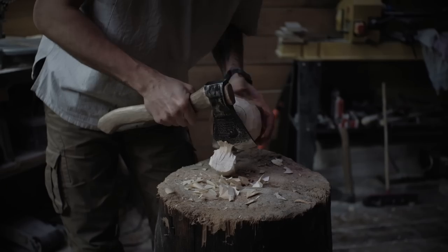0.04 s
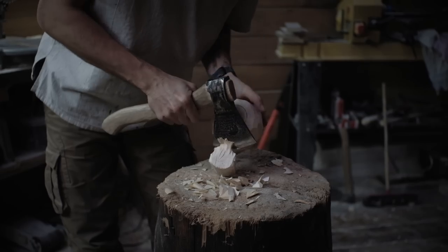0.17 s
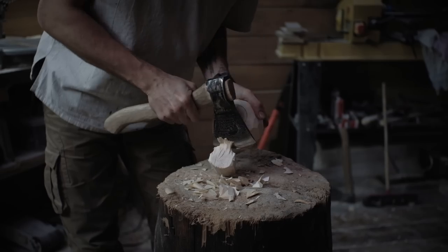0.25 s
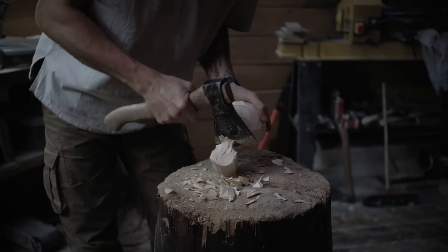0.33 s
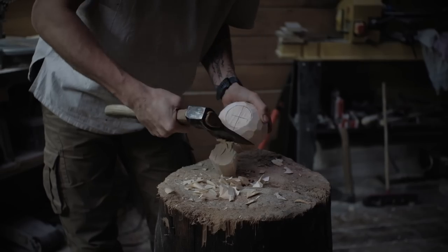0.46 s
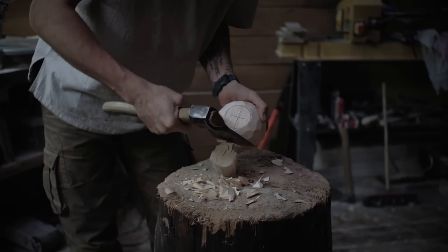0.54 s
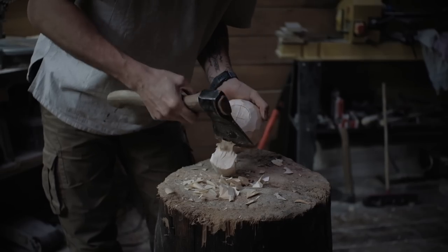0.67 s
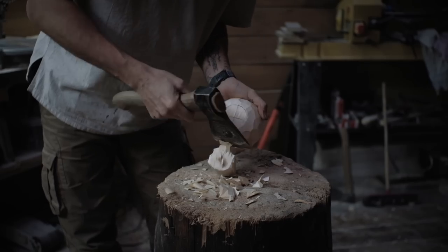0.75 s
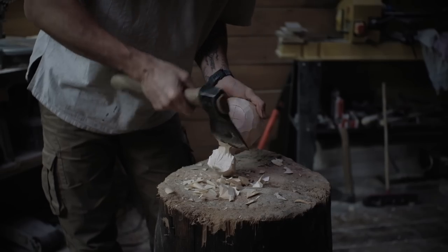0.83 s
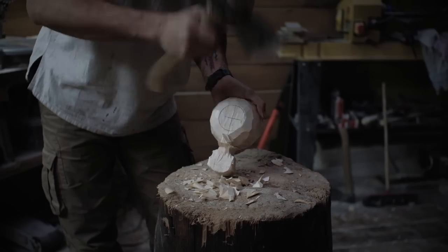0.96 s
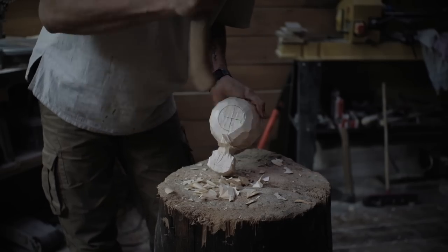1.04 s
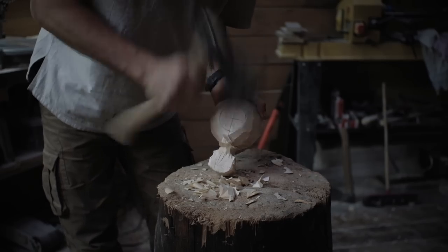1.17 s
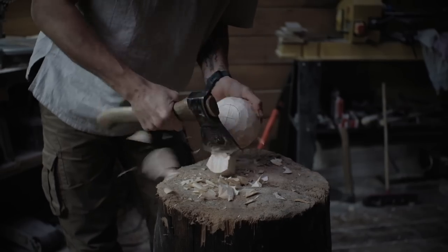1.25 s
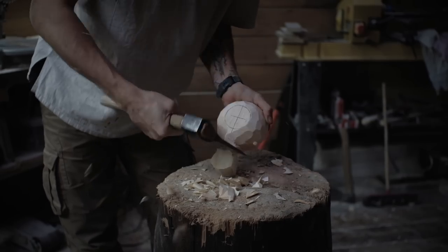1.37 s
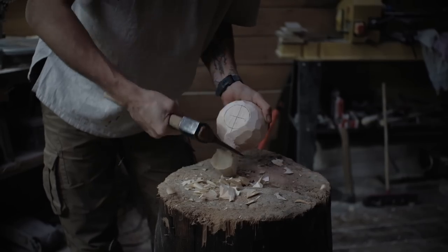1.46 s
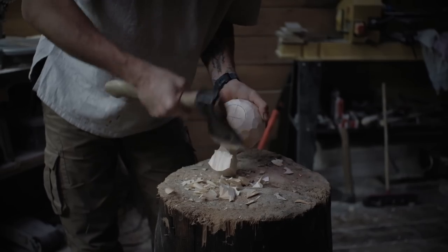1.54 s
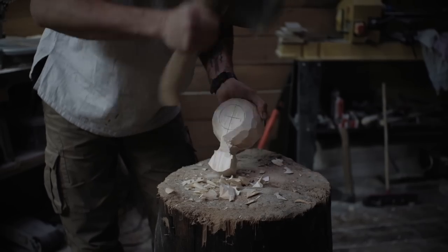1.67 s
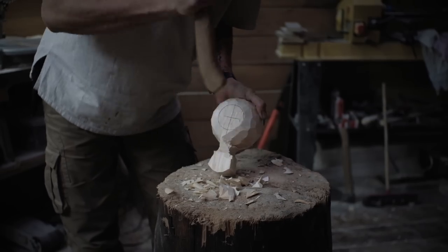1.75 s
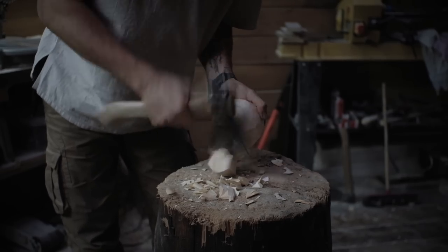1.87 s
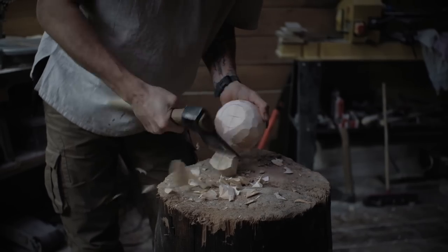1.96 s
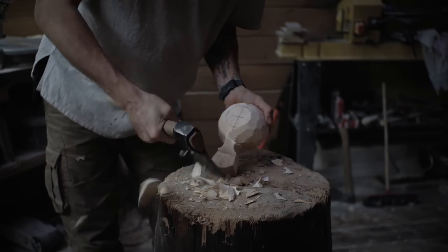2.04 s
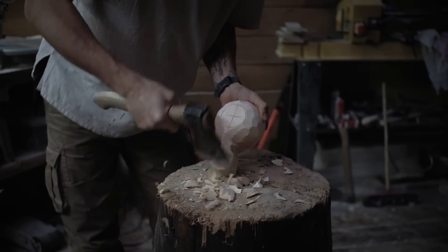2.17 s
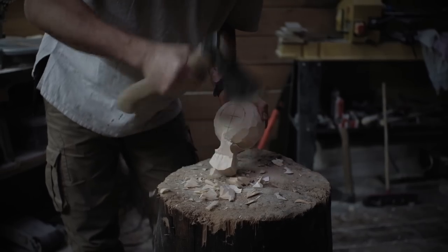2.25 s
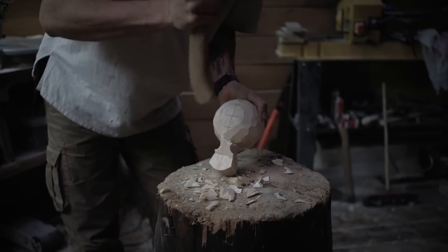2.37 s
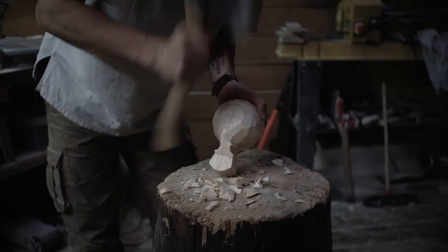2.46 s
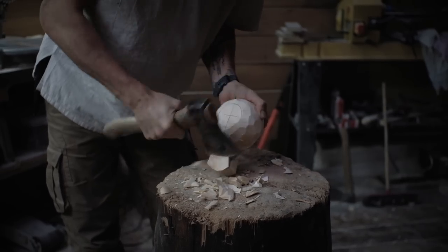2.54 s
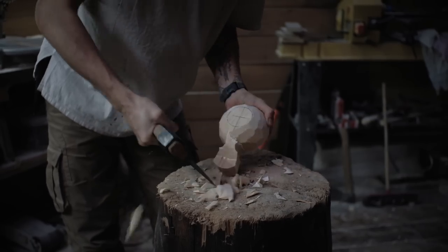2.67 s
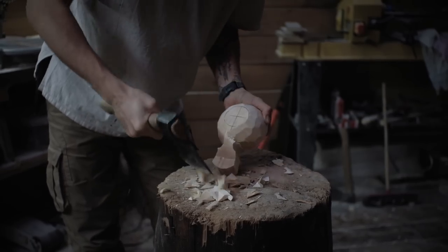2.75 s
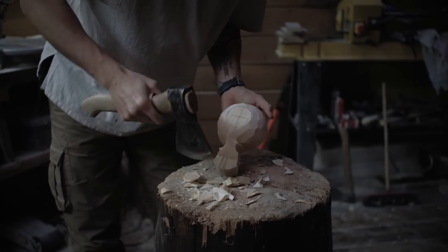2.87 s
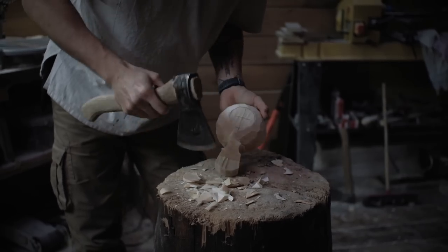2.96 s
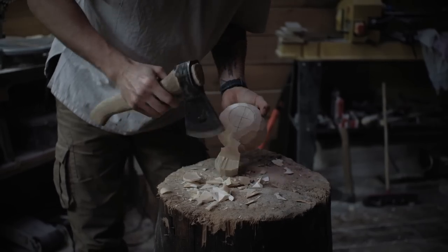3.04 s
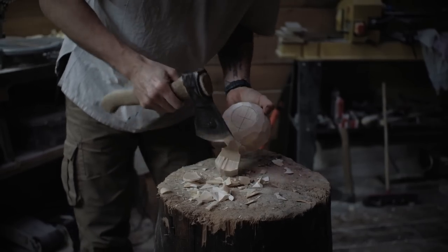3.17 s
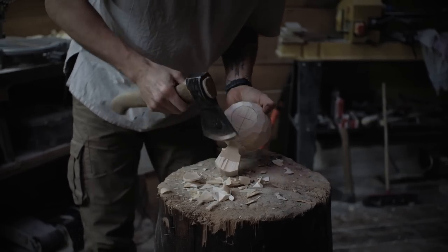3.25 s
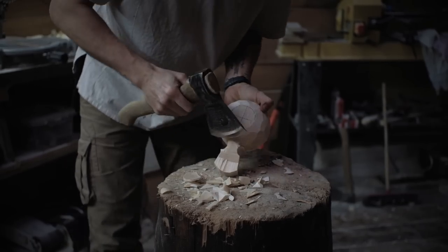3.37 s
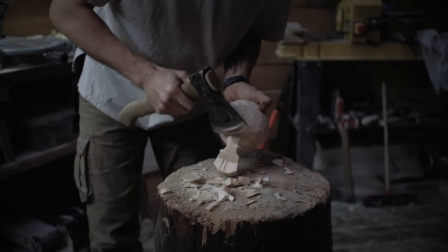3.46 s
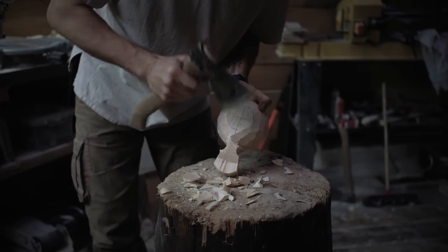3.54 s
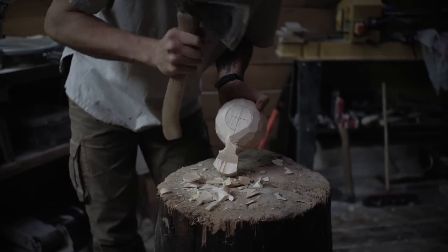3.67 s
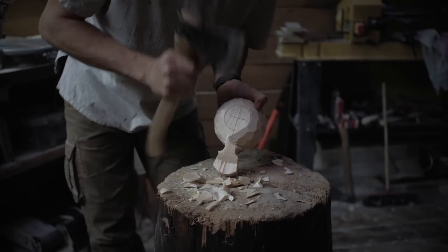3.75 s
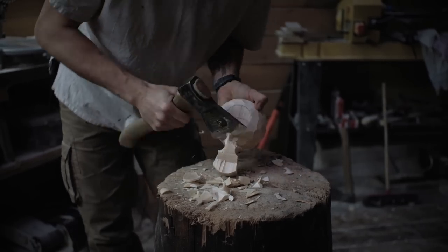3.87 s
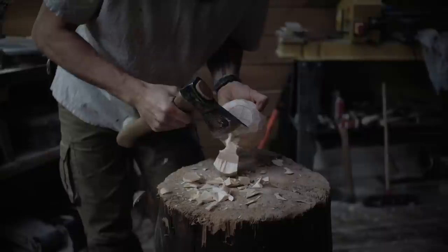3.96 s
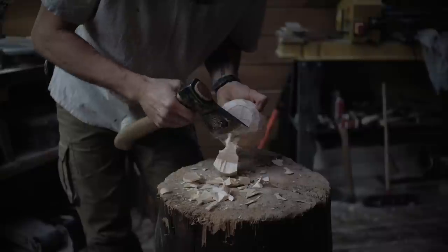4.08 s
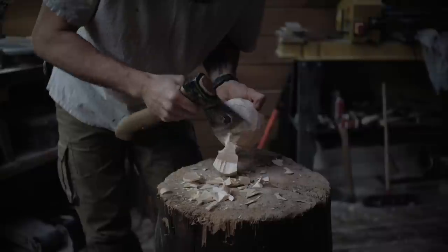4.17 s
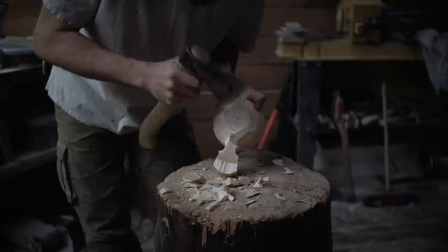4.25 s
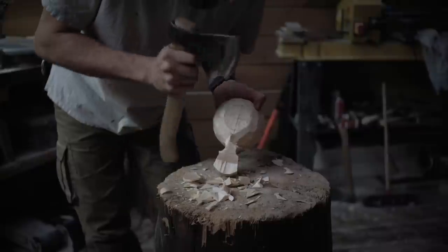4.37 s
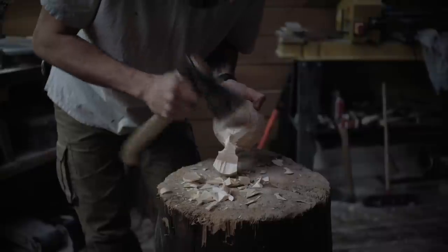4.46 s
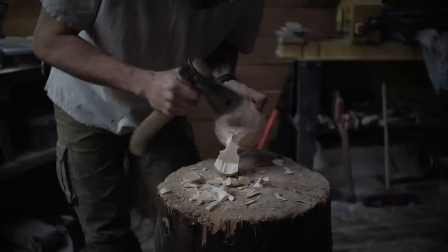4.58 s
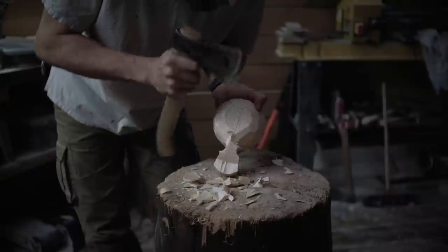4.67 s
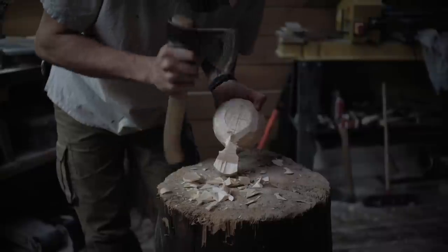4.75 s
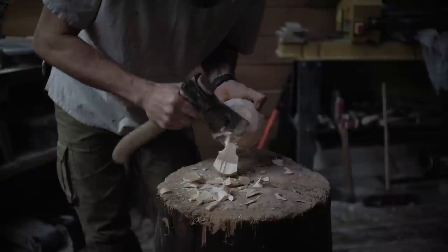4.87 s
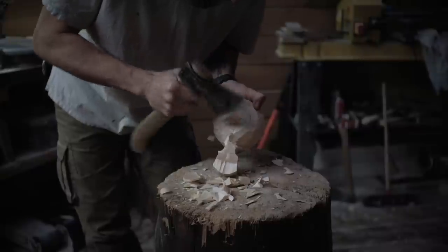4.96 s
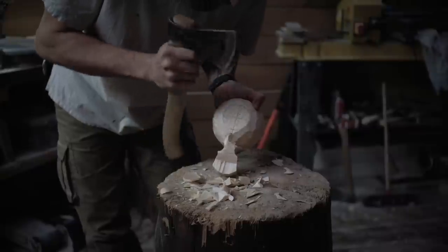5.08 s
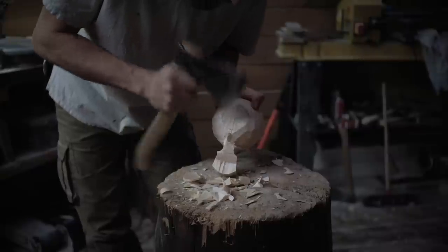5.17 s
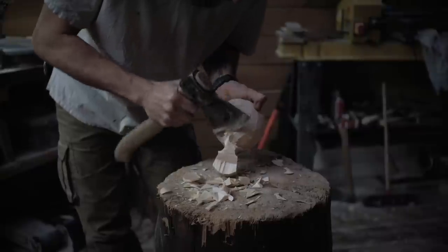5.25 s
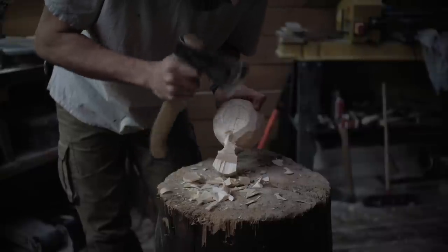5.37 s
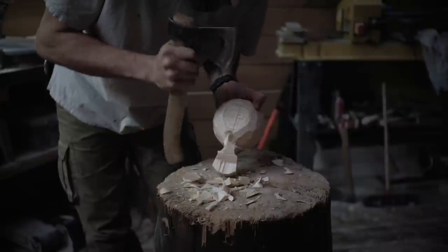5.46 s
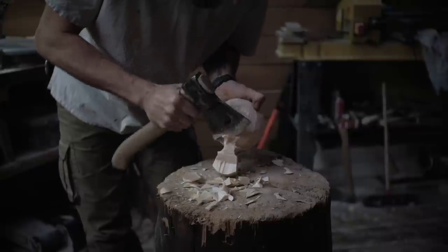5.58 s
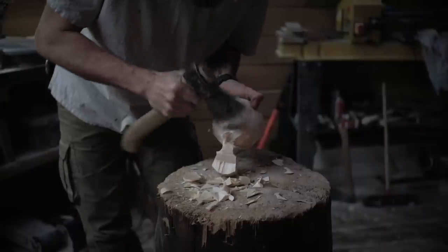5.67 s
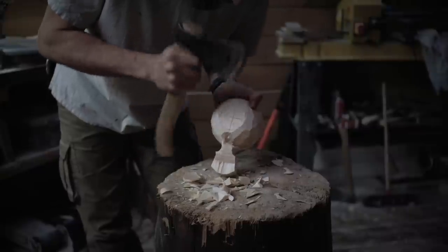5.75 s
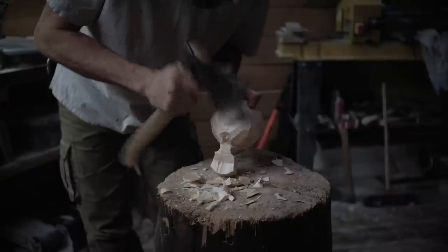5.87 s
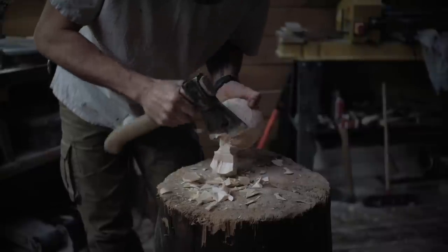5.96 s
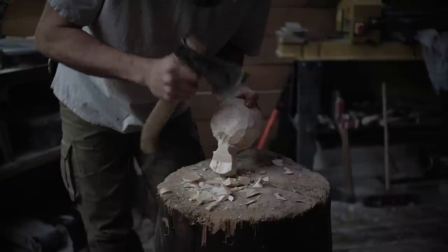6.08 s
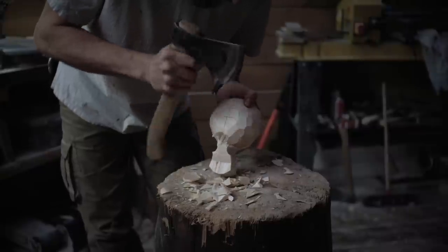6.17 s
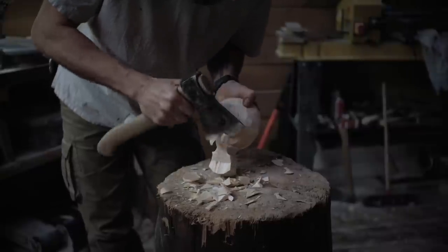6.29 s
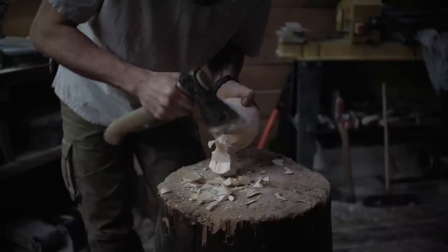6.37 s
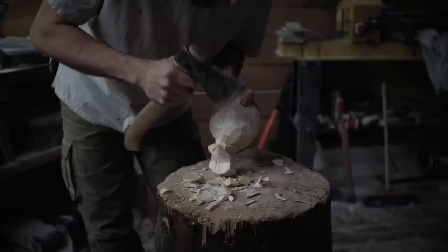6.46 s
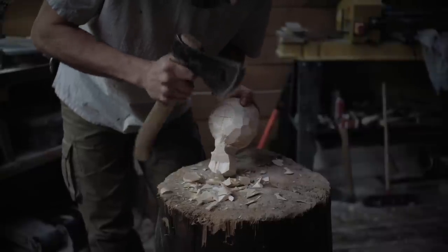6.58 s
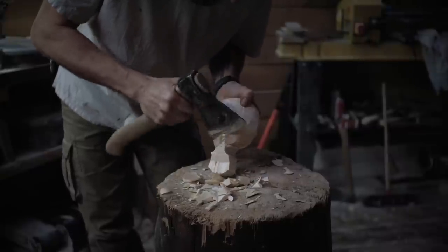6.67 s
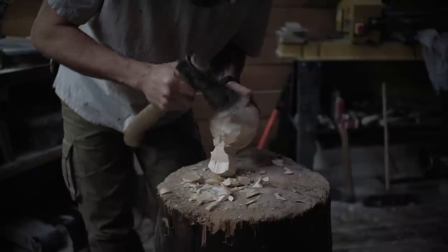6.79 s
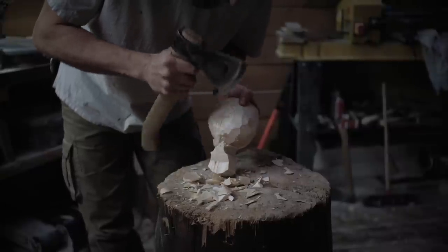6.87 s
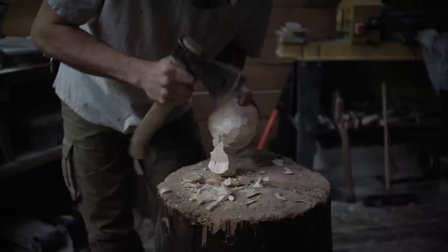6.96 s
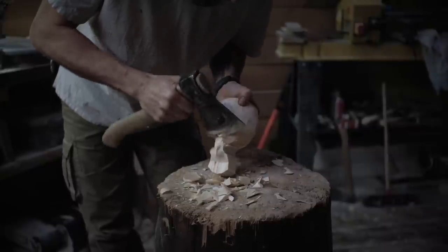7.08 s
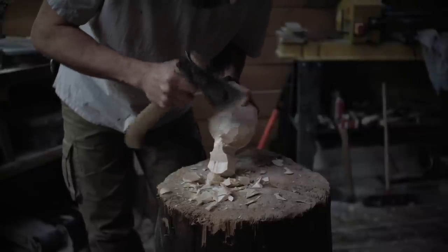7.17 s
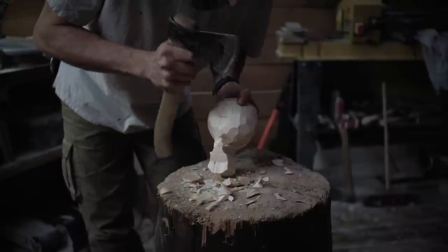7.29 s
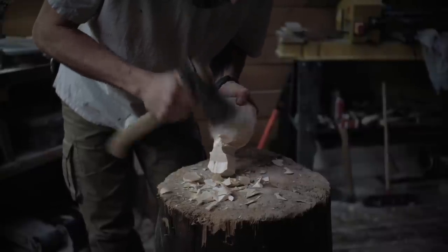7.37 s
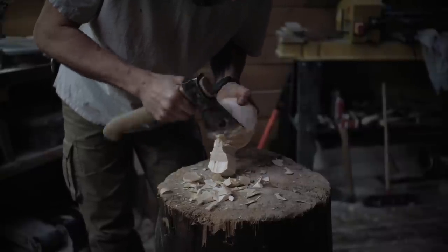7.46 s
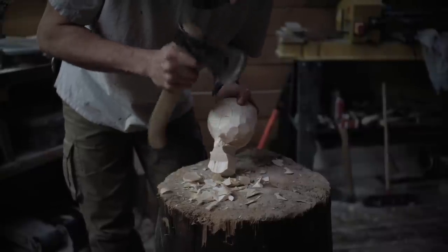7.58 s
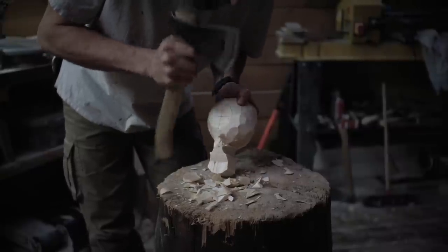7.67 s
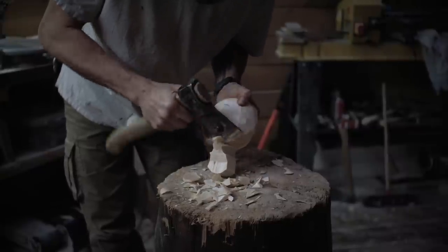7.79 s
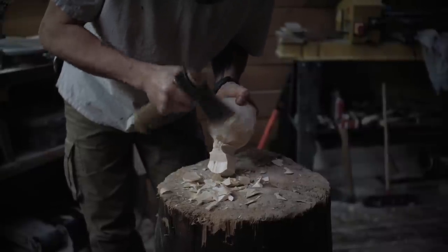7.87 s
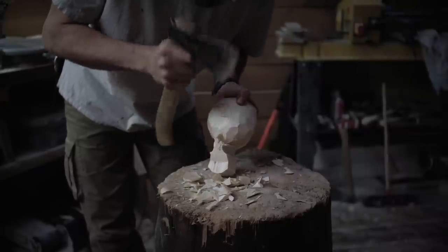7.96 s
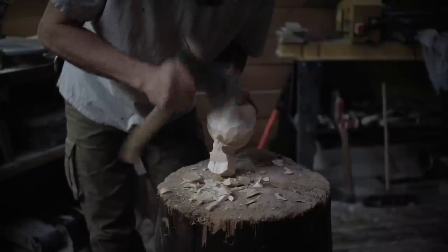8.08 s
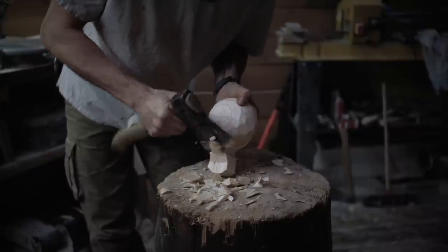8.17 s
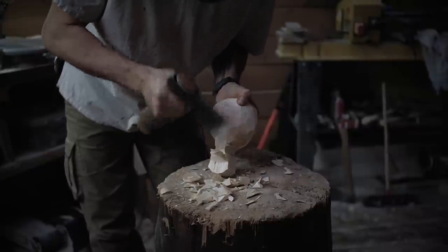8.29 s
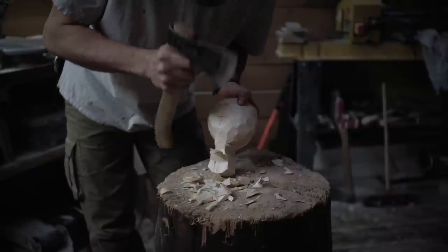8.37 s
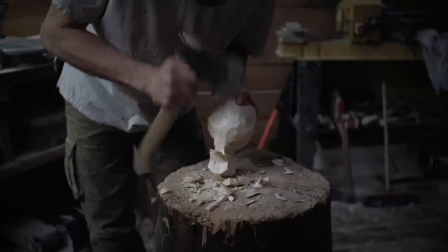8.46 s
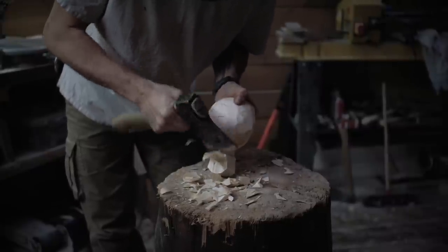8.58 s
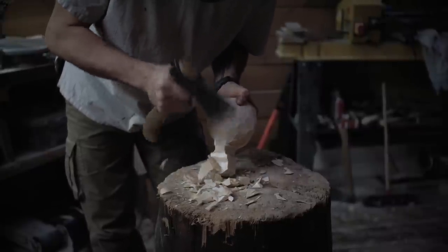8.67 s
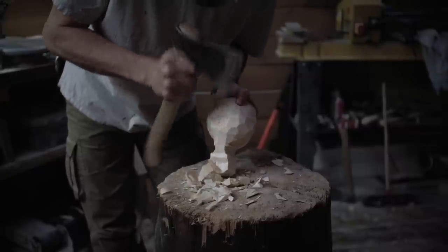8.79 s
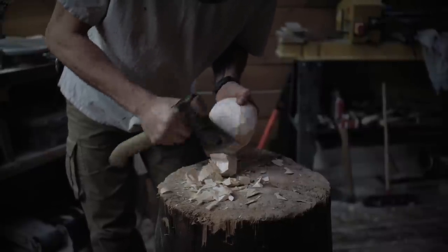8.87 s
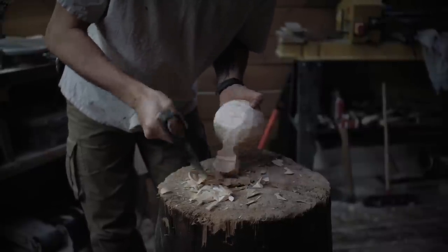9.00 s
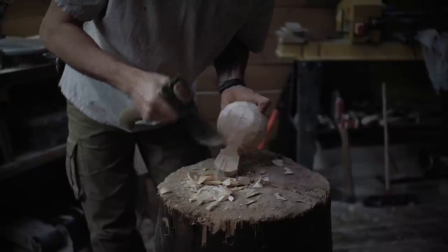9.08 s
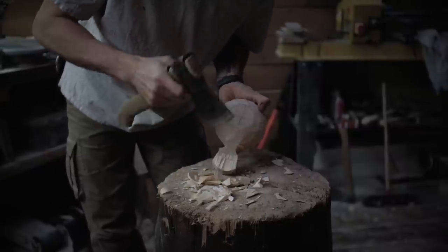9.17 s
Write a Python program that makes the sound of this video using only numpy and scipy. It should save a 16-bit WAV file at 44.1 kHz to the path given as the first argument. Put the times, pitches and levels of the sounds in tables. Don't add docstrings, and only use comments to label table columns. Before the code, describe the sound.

Close stereo sound of an axe hewing wet wood on a chopping block. A hushed opening with tiny ticks of chips, then several hard, uneven strokes: hollow knock, fibrous crack, brief dull steel ring. A scraping pause leads into regular lighter chops, nearly three each second, strengthening at the end. Small timber workshop, short tail, soft low floor thump beneath.

```python
import sys
import numpy as np
from scipy import signal
from scipy.fft import rfft, irfft
from scipy.io import wavfile
from scipy.ndimage import uniform_filter1d

SR = 44100
rng = np.random.default_rng(int(sys.argv[2]) if len(sys.argv) > 2 else 0)


def digitize_waveform(pressure):
    field = np.atleast_2d(pressure).T
    bounded = np.clip(field, -1, 1)
    quanta = np.round(bounded * 32767).astype(np.int16)
    wavfile.write(sys.argv[1], SR, quanta)


def gain_from_db(level_db):
    decades = np.asarray(level_db, float) / 20
    return 10 ** decades


N = 407043

# (frequency [Hz], level [dB])
HUSH_SPECTRUM = [(20, -1), (33, -8.5), (172, -8.5), (245, -10.5), (295, -11.5), (430, -11.5), (3970, -35.5),
                 (14500, -51.5)]
# (frequency [Hz], side re mid [dB])
HUSH_WIDTH = [(60, -3.5), (300, -4), (1500, -2), (15000, 1.8)]
# (frequency [Hz], level [dB], t60 [s])
FLOOR_MODES = [(31.5, -1, 0.4), (49.7, -8, 0.33), (78.5, -3, 0.36), (100.8, -5.5, 0.38)]
# (time [s], knock [dB], crack re knock [dB], edge tick re knock [dB], length [ms])
SCRAPES = [(0.003, -33.5, 2.5, -40.5, 5.8), (0.17, -27.5, -3, -2, 41), (0.41, -32.5, 6, -6, 24),
           (0.58, -45, 15, -30, 110), (0.7, -58, 22, -30, 62), (0.8, -56, 10, -25, 58),
           (1.35, -8.5, 11.5, -22, 12), (1.609, -15.5, -9, -25, 14), (1.806, -22.5, 14, -4, 7.2),
           (1.919, -1.5, -6.5, -13, 3.9), (2.045, -6, 4, -17, 4), (2.218, -10, -35, -40, 6.3),
           (2.672, -13.5, 13.5, -3, 9.2), (2.92, -20, -20, -39, 8.9), (2.996, -31, -43, -37, 17),
           (3.058, -4, 7.5, -44, 2.8), (3.41, -24, 3, -14, 30), (3.55, -27.5, 8, -10, 26),
           (8.23, -23, 16, 4, 3), (3.145, -20.5, 10, -34, 5.8), (3.596, -31, 14, -18, 11.4),
           (4.804, -44, 20.5, -14, 4), (7.446, -8, 3, -13, 3.26)]
# (time [s], knock [dB], crack re knock [dB], edge tick re knock [dB])
TAPS = [(0.158, -26.5, 14, -18), (0.211, -39, 23.5, 5), (0.289, -31.5, -3, -43), (0.358, -44.5, 12.5, 7.5),
        (0.373, -56.5, 25.5, -13), (0.425, -42, 13.5, -1), (0.483, -48.5, 19, 10.5), (0.55, -40.5, 8, -31),
        (0.875, -56, 5, -19), (1.414, -30.5, -23, -34), (1.465, -43.5, 24.5, 10.5), (1.701, -38, 3.5, -47),
        (2.305, -34, -6, -36), (2.332, -23, 3, -49), (2.436, -33, 7, -36), (3.108, -21, 19.5, -55),
        (3.323, -21, -14, -32), (3.396, -18, 0, -20), (3.54, -30.5, 14, -22), (4.019, -42, 0, -33),
        (4.466, -33, 22.5, 8.5), (4.706, -41.5, 20, -33), (5.09, -53, -27, -17), (6.242, -51, 7.5, -18),
        (6.597, -42, -9, -12), (8.368, -49, 6, -4)]
# (time [s], knock [dB], knock pitch [Hz], crack re knock [dB], edge tick re knock [dB])
CHOPS = [(1.253, 13.5, 922, 1.5, -17.5), (1.942, 14, 850, 4, -9.5), (2.572, 16, 1004, 4.5, -28.5),
         (3.873, -7, 610, -2.5, -6.5), (4.5384, -9, 537, 6, -11), (4.9052, -9, 574, 4.5, -5),
         (5.2605, -12, 520, 2, -14), (5.623, -3, 760, -1.5, -8.5), (5.961, -2.5, 780, -1.5, -1.5),
         (6.324, -9, 700, -1.5, -15.5), (6.7048, -11.5, 680, -1.5, -7), (7.075, -4.5, 850, -2.5, -28),
         (7.453, -3.5, 716, -5.5, -8.5), (7.805, 1.5, 823, -2, -12.5), (8.175, 4.5, 947, -2.5, -13.5),
         (8.56, 8, 883, -9.5, -10.5), (8.913, 7.5, 1090, 3.5, -10)]
# (time [s], knock [dB], knock pitch [Hz], crack re knock [dB], edge tick re knock [dB])
SIDE_BLOWS = [
    (1.557, 1.5, 810, -13, -38),
    (1.826, 16, 580, -6, -47),
    (2.203, -8.5, 920, -2, -13),
    (2.494, 9.5, 685, -10, -39),
    (2.866, -1, 587, -33, -35.5),
    (3.055, 1, 904, 1.5, -48),
]
# (knock [dB], clean share [0-1], cut [ms], split [ms],
# bite crack re split [dB], bite edge re split [dB])
GLANCING = (-8, 0.66, 3, 4, -8, -16)
# (knock [dB], clean share [0-1], cut [ms], split [ms], # bite crack re split [dB], bite edge
# re split [dB])
FIRM = (3.5, 0.37, 1.98, 1.5, -1.5, -4.5)
# (frequency [Hz], level [dB])
BODY_SPECTRUM = [(120, -29.5), (250, -31), (450, -2.5), (700, 5.5), (1000, -17), (1500, -71), (2500, -54),
                 (16000, -101.5)]
# (frequency [Hz], level [dB])
CRACK_SPECTRUM = [(120, -78), (800, -6.5), (1300, 3.5), (2000, -0.5), (3000, -1), (4500, -15.5),
                  (7000, -24), (16000, -65.5)]
# (frequency [Hz], level [dB])
EDGE_SPECTRUM = [(120, -91.5), (3000, -26), (5000, 4.5), (7000, -16), (10000, -2), (13000, -23),
                 (16000, -36.5)]
# (frequency [Hz], level [dB], t60 [s])
WOOD_MODES = [(144.4, 3.5, 0.068), (315.7, -6.5, 0.16), (417.2, -5, 0.077), (487.3, -7.5, 0.09),
              (579, -7, 0.063), (700, 6.5, 0.01), (786, 14.5, 0.0086), (1060, -2, 0.062),
              (1213, 4.5, 0.011)]
# (frequency [Hz], level [dB], t60 [s])
STEEL_GROUPS = [
    [(2040, 0, .022), (2700, -1, .018)],
    [(3310, -2, .017)],
    [(4600, -4, .022), (4900, -12, .01)],
    [(6800, -13, .012), (8850, -13, .015), (10600, -15, .011), (13300, -24, .012)],
]
# (time [s], glancing ring [dB], twisting ring [dB], cheek ring [dB])
HEAD_FREEDOM = [(.4, -35, -37, -41), (.484, -32, -35, -20), (.876, -35, 11, -8), (1.25, -11, -22, -19),
                (3.5, -59, -32, -27.5), (3.87, -4, -36, -1.5), (4.47, -10.5, -20, -22),
                (4.54, -3.5, -13, -10), (4.91, -18, -47, -4.5), (5.27, 7.5, -24, 2.5),
                (5.8, -11.5, -26, -18), (6.33, 3, -29, 3.5), (6.71, 1, -2, 4), (7.45, -14.5, -33, -20.5),
                (8.17, -13, -22, -5.5), (8.56, -30.5, 13, 0.5), (8.91, -10.5, -36, -7)]
# (delay [s], left [dB], right [dB])
NEAR_ECHOES = [(.0047, -7, -16.5), (.0073, -9, -12.5)]
# (frequency [Hz], t60 [s], wet [dB], side re mid [dB])
SHOP_TAIL = [(61, 0.43, -36, -20.5), (268, 0.31, -27, -18.5), (600, 0.28, -24, -13),
             (1670, 0.32, -28, -5.5), (4000, 0.27, -33, 1), (9130, 0.22, -32.5, 2), (16260, 0.18, -41, 8)]

HUSH_DB, PAN_DB = -55.5, -1.6
JOLT_DB, JOLT_FOLLOWS, JOLT_LIMIT_DB, EARLIER_JOLT_DB = -47.5, 0.95, 10.5, -60.5
TAP_DB, TAP_HZ, TAP_MS, TAP_CLEAN_SHARE = 3.5, 656, 2.7, 0.6
SCRAPE_DB, SCRAPE_HZ = -5, 821
SPLIT_LAG_S = .0012, .006
PARTING_DB = -15.5
STEEL_DB, BEND_DB, RIM_DB = -10, -0.5, -2.5
WOOD_SPREAD_DB, STEEL_SPREAD_DB, JOLT_SPREAD_DB = 2.0, 2.2, 2.5
KNEE_DB, SQUEEZE, ATTACK_S, RELEASE_S = -9.5, .97, .0022, 0.054
MIC_TOP_HZ = 15000


def filt(x, order, hz, kind):
    return signal.sosfilt(signal.butter(order, hz, kind, fs=SR, output="sos"), x)


def at_hz(rows, hz):
    f, *columns = np.transpose(rows)
    return [np.interp(np.log(hz), np.log(f), c) for c in columns]


def bands(low_hz, high_hz):
    octaves = np.arange(0, np.log2(high_hz / low_hz) - .2, .5)
    edges = np.append(low_hz * 2 ** octaves, high_hz)
    return zip(edges, edges[1:], np.sqrt(edges[1:] * edges[:-1]))


def hush():
    white, out = rng.standard_normal((2, 2, N)), 0
    for k, (low, high, hz) in enumerate(bands(20, 15500)):
        noise = filt(white[k % 2], order=2, hz=[low, high], kind="band")
        mid, side = gain_from_db(at_hz(HUSH_SPECTRUM, hz)[0]) * noise
        out = out + mid + gain_from_db(at_hz(HUSH_WIDTH, hz)[0]) * side * np.array([[1], [-1]])
    return gain_from_db(HUSH_DB) * out / np.std(np.mean(out, axis=0))


def ring(clicks, hz, t60_s):
    r, w = gain_from_db(-60 / (t60_s * SR)), 2 * np.pi * hz / SR
    return signal.lfilter([0, np.sin(w)], [1, -2 * r * np.cos(w), r * r], clicks + 1e-18)


def joists():
    out, (s, knock_db) = 0, np.transpose(CHOPS)[:2]
    jolt_db = JOLT_DB + JOLT_FOLLOWS * np.minimum(knock_db, JOLT_LIMIT_DB)
    s, db = np.append(s, 0), np.append(jolt_db, EARLIER_JOLT_DB)
    luck = rng.standard_normal((len(s), len(FLOOR_MODES)))
    for k, (hz, mode_db, t60_s) in enumerate(FLOOR_MODES):
        clicks = np.zeros(N)
        clicks[(s * SR).astype(int)] = gain_from_db(db + mode_db + JOLT_SPREAD_DB * luck[:, k])
        out = out + filt(ring(clicks, hz, t60_s), order=2, hz=[hz / 1.4, hz * 1.5], kind="band")
    return gain_from_db(20) * out


def snapping_fibres(ms, size):
    age = np.arange(size) * 1000 / SR / np.maximum(ms, .3)
    shape = (len(ms), size)
    snaps = rng.standard_normal(shape) * (rng.random(shape) < 5000 / SR)
    snaps *= age * np.exp(-age ** 2)
    tone = rfft(snaps + 1e-9)
    tone /= np.sqrt(uniform_filter1d(np.abs(tone) ** 2, size=24, axis=1))
    snaps = irfft(tone) * (age < 2.5)
    return snaps / np.linalg.norm(snaps + 1e-9, axis=1, keepdims=True)


def colour(force, crack_db, edge_db):
    out = 0
    for k, (low, high, hz) in enumerate(bands(119.0, 14000)):
        body = gain_from_db(at_hz(BODY_SPECTRUM, hz)[0])
        crack = gain_from_db(crack_db + at_hz(CRACK_SPECTRUM, hz)[0])
        edge = gain_from_db(edge_db + at_hz(EDGE_SPECTRUM, hz)[0])
        band = filt(force, order=2, hz=[low, high], kind="band")
        out = out + (body + crack + edge) * band * (-1) ** k
    return out


def modes(force, table, spread_db):
    luck = rng.standard_normal((len(force), len(table)))
    return sum(gain_from_db(db + spread_db * luck[:, [k]]) * ring(force, hz, t60_s)
               for k, (hz, db, t60_s) in enumerate(table))


def knocked_wood(force, hz):
    push = filt(force, order=2, hz=1720, kind="low")
    free_end = np.array([ring(p, f, 0.01) for p, f in zip(push, hz[:, 0])])
    block = modes(push, WOOD_MODES, spread_db=WOOD_SPREAD_DB)
    return filt(free_end + 0.16 * block, order=4, hz=169.2, kind="high")


def axe_head(force, s):
    when, glance_db, twist_db, cheek_db = np.transpose(HEAD_FREEDOM)
    freedom_db = glance_db + BEND_DB, twist_db, cheek_db, glance_db + RIM_DB
    return sum(gain_from_db(np.interp(s, when, free_db)) * modes(force, group, spread_db=STEEL_SPREAD_DB)
               for free_db, group in zip(freedom_db, STEEL_GROUPS))


def contacts(table, bite, lag_s=.0018, size=6144):
    s, db, hz, crack_db, edge_db, ms = np.transpose(table)[:, :, None]
    force = (1 - bite) * snapping_fibres(ms, size)
    force[:, :1] = bite
    wood = 0.91 * knocked_wood(force, hz)
    fibres = 4.7 * colour(force, crack_db, edge_db)
    steel = gain_from_db(crack_db + STEEL_DB) * axe_head(force, s)
    sound = gain_from_db(db) * (wood + fibres + steel)
    out = np.zeros((3, N + size))
    pose = np.arange(len(s))[:, None] % 3
    np.add.at(out, (pose, ((s + lag_s) * SR).astype(int) + np.arange(size)), sound)
    return out[:, :N]


def chips():
    scatter = np.exp(0.45 * rng.standard_normal(len(TAPS)))
    taps = [(s, db + TAP_DB, TAP_HZ * k, crack_db, edge_db, TAP_MS)
            for (s, db, crack_db, edge_db), k in zip(TAPS, scatter)]
    scrapes = [(s, db + SCRAPE_DB, SCRAPE_HZ, crack_db, edge_db, ms)
               for s, db, crack_db, edge_db, ms in SCRAPES]
    return contacts(taps, bite=TAP_CLEAN_SHARE) + contacts(scrapes, bite=0)


def blows():
    s, db, hz, crack_db, edge_db = np.transpose(CHOPS + SIDE_BLOWS)
    firmness = np.interp(db, [GLANCING[0], FIRM[0]], [0, 1])
    limits = [*zip(GLANCING[1:], FIRM[1:]), SPLIT_LAG_S]
    clean, cut_ms, split_ms, dull_db, blunt_db, lag_s = (
        soft + firmness * (hard - soft) for soft, hard in limits)
    bites = np.transpose([s, db, hz, crack_db + dull_db, edge_db + blunt_db, cut_ms])
    splits = np.transpose([s + lag_s, db + PARTING_DB, hz,
                           crack_db - PARTING_DB, edge_db - PARTING_DB, split_ms])
    return contacts(bites, bite=np.clip(clean, 0, 1)[:, None]) + contacts(splits, bite=0)


def workshop(x, size=30000):
    age, white = np.arange(size) / SR, rng.standard_normal((2, 2, size))
    answer = np.zeros((2, size))
    for k, (low, high, hz) in enumerate(bands(40, 17000)):
        t60_s, wet_db, side_db = at_hz(SHOP_TAIL, hz)
        noise = filt(white[k % 2], order=2, hz=[low, high], kind="band")
        mid, side = noise * gain_from_db(wet_db - 60 * age / t60_s)
        answer += mid + gain_from_db(side_db) * side * [[1], [-1]]
    answer *= 1 - np.exp(-(age / 0.0039) ** 2)
    answer[:, 0] += 1
    for s, left_db, right_db in NEAR_ECHOES:
        answer[:, int(s * SR)] += gain_from_db(np.array([left_db, right_db]))
    return signal.oaconvolve(x[None], answer, axes=1)[:, :N]


def scene():
    room = sum(workshop(pose) for pose in chips() + blows())
    return (room + joists() + hush()) * gain_from_db(np.array([[PAN_DB], [-PAN_DB]]) / 2)


def low_pass(x):
    return signal.sosfilt(signal.butter(12, 16810, fs=SR, output="sos"), x)


def record(dry):
    dry = filt(dry, order=4, hz=MIC_TOP_HZ, kind="low")
    peak_db = 20 * np.log10(np.max(np.abs(dry), axis=0) + 1e-9)
    over_db = np.maximum(peak_db - KNEE_DB, 0)
    fall = np.arange(N) / (RELEASE_S * SR)
    held_db = np.exp(np.maximum.accumulate(np.log(over_db + 0.00073) + fall) - fall)
    r = np.exp(-1 / (ATTACK_S * SR))
    held_back = dry * gain_from_db(-SQUEEZE * signal.lfilter([1 - r], [1, -r], held_db))
    ceiling = held_back / (1 + np.abs(held_back) ** 3) ** (1 / 3)
    mix = 1.077 * ceiling
    return low_pass(mix)


dry = scene()
out = record(dry)
digitize_waveform(out)
```